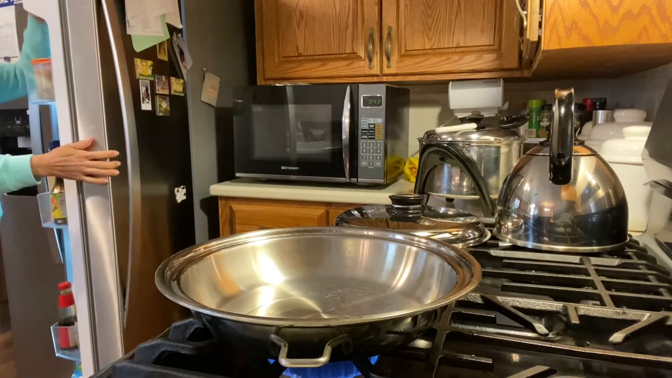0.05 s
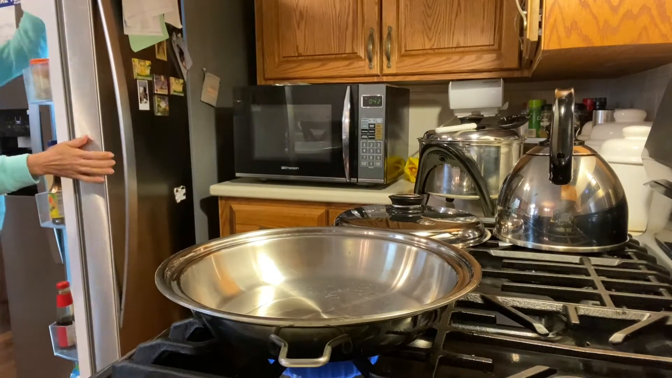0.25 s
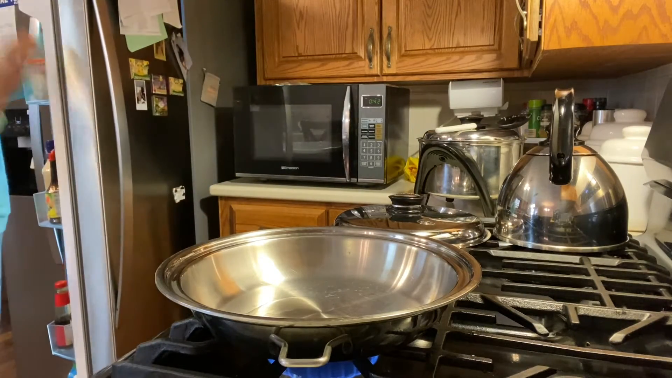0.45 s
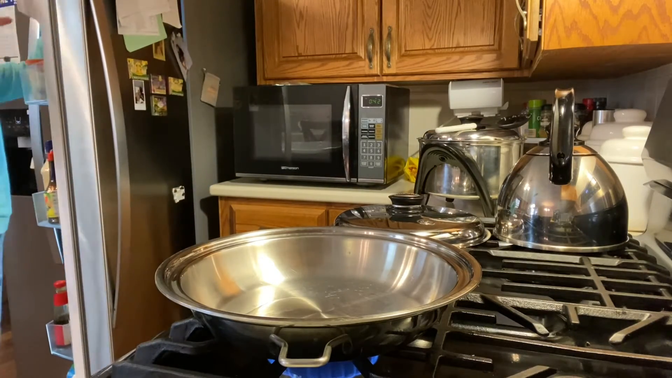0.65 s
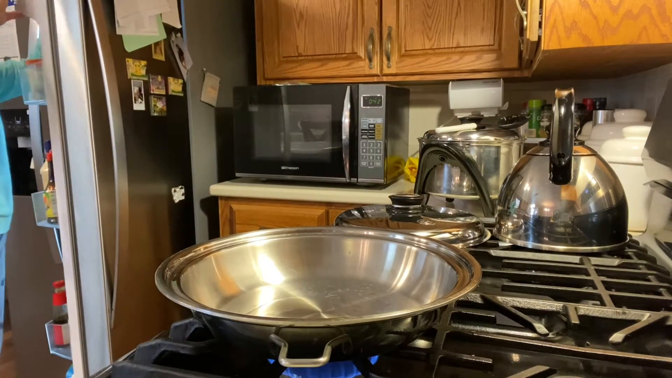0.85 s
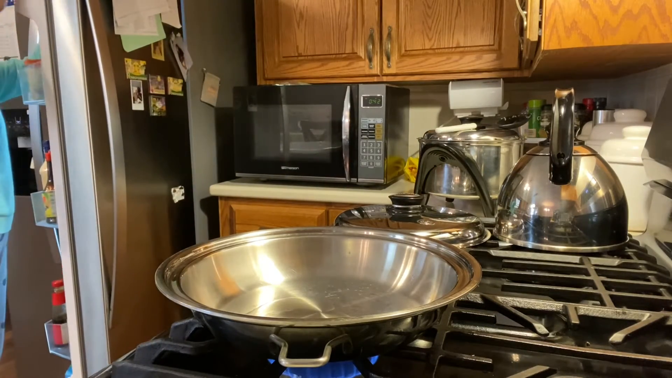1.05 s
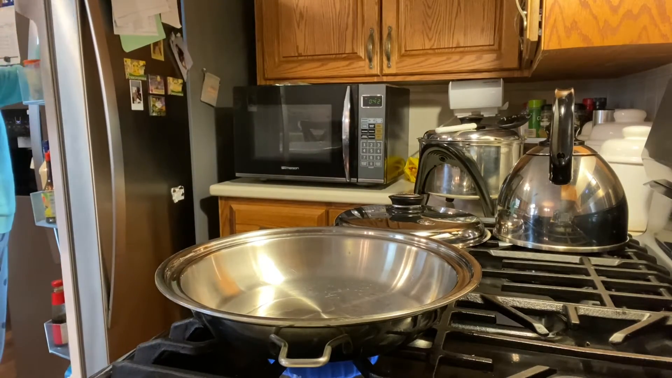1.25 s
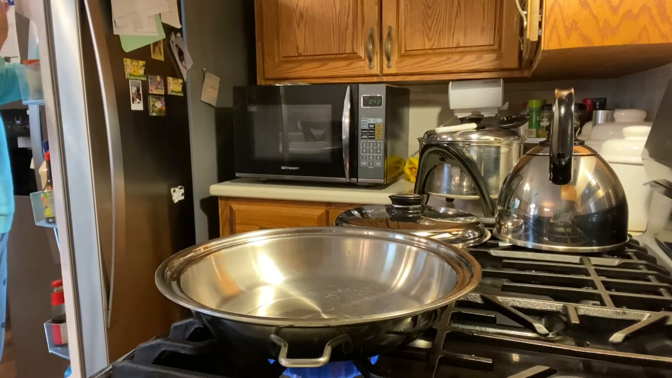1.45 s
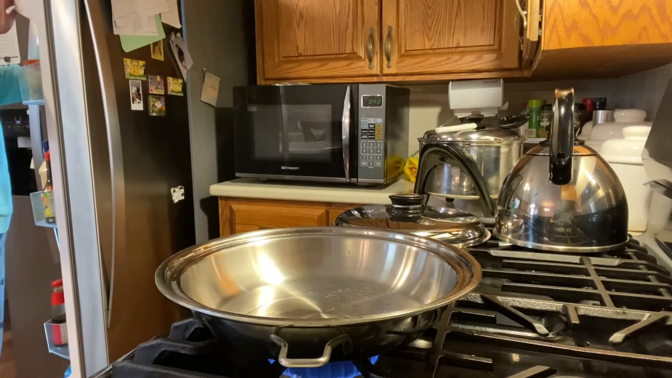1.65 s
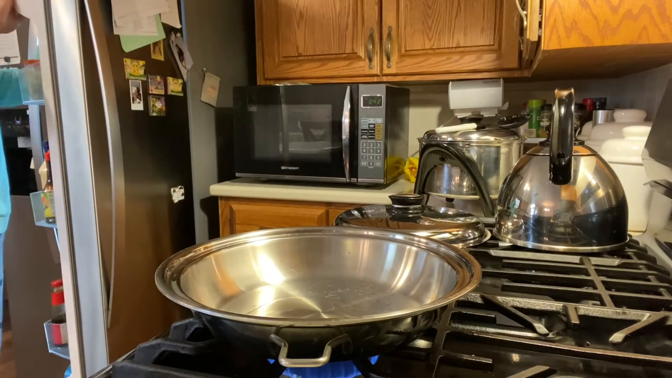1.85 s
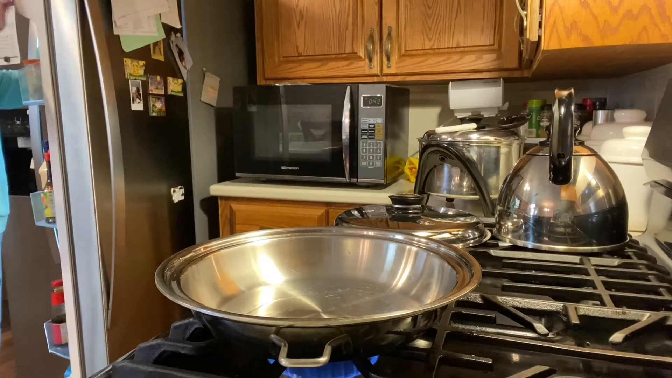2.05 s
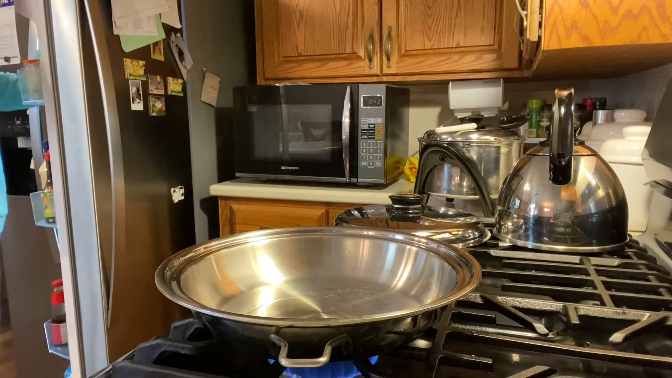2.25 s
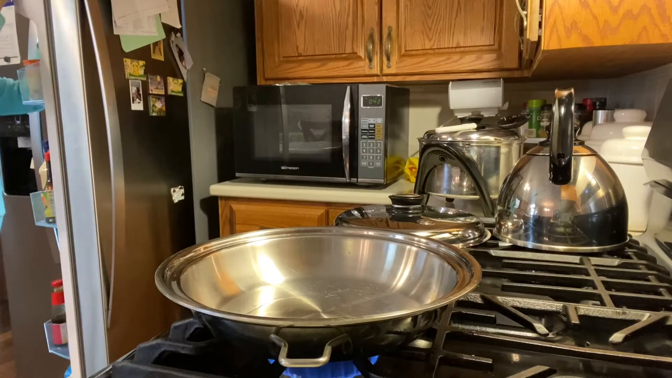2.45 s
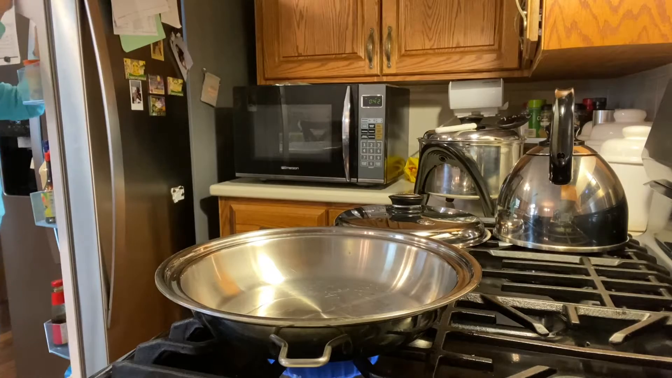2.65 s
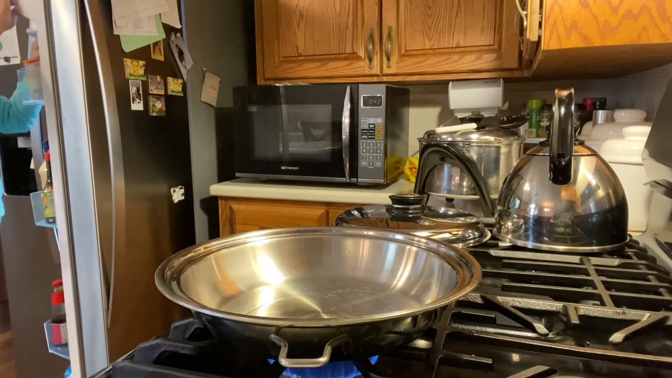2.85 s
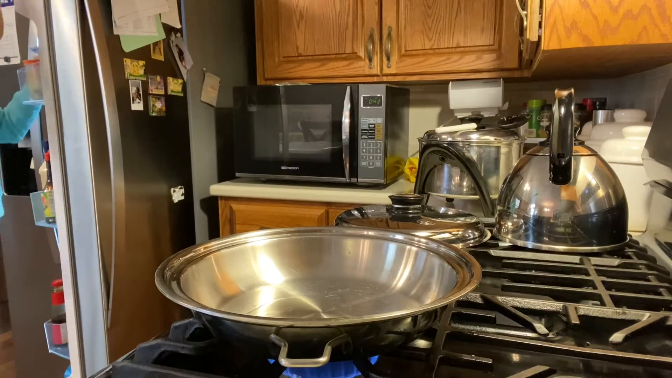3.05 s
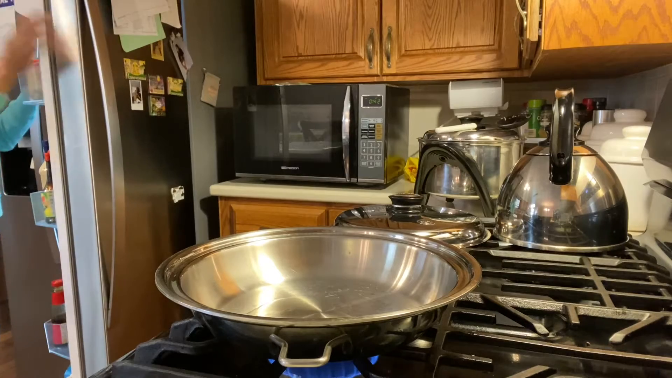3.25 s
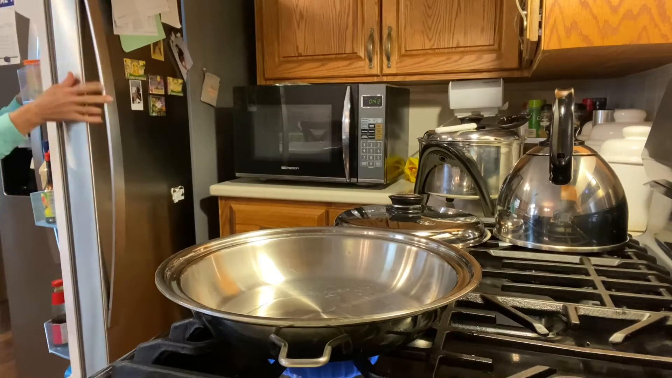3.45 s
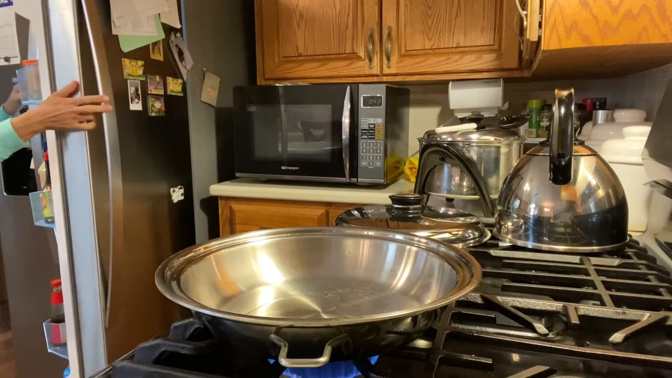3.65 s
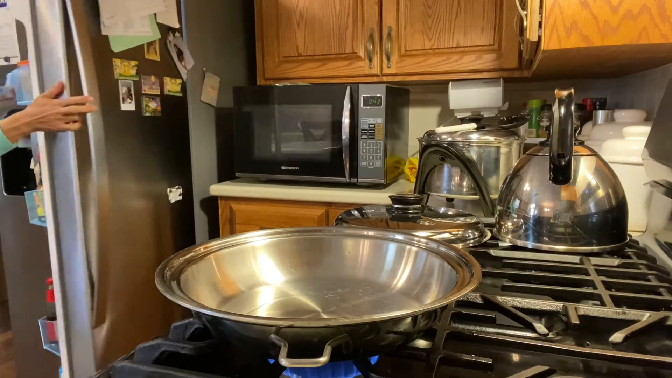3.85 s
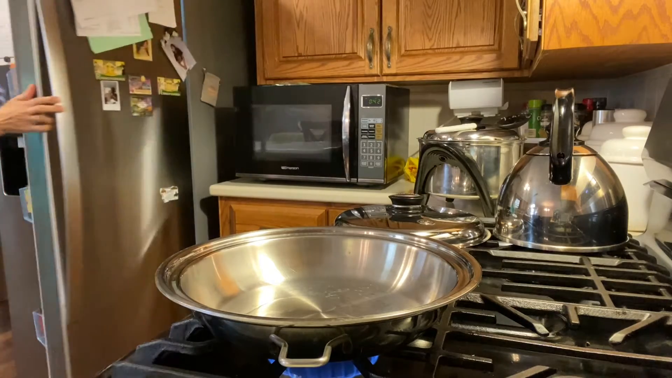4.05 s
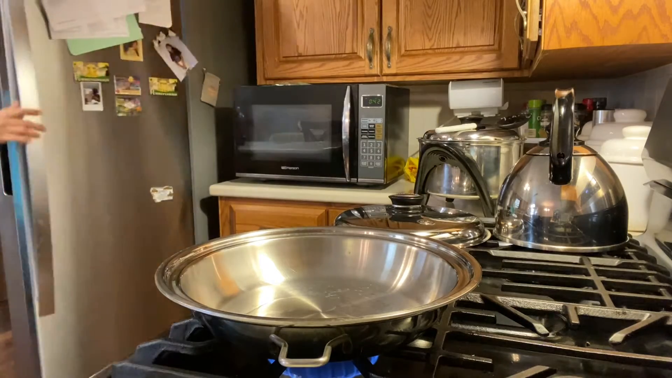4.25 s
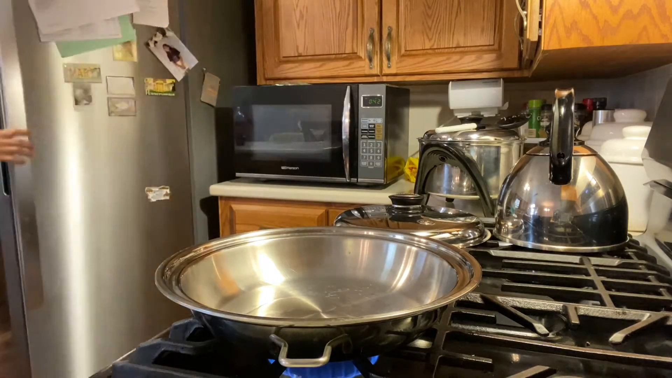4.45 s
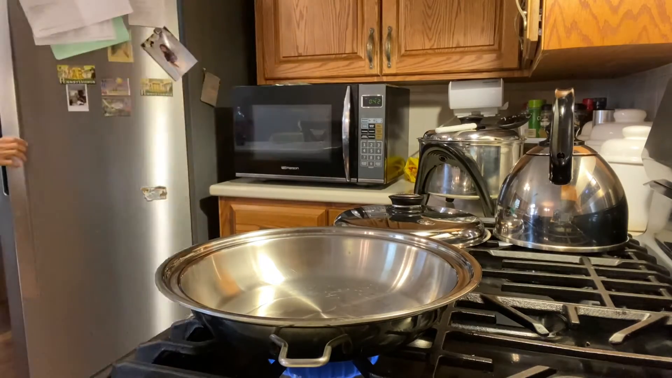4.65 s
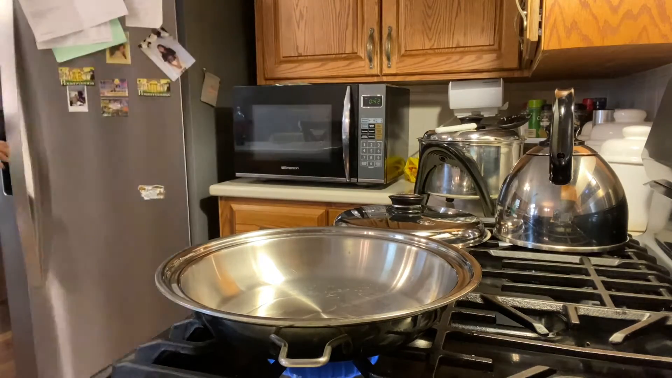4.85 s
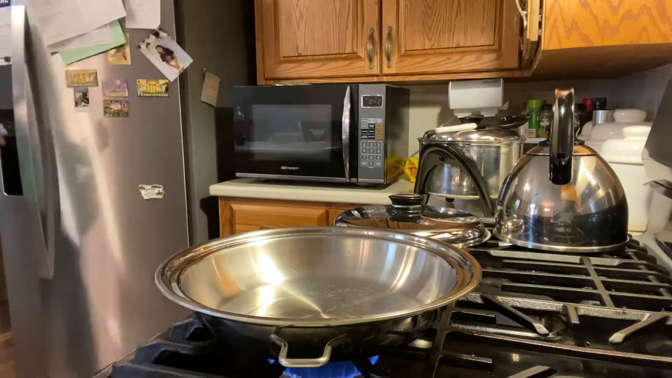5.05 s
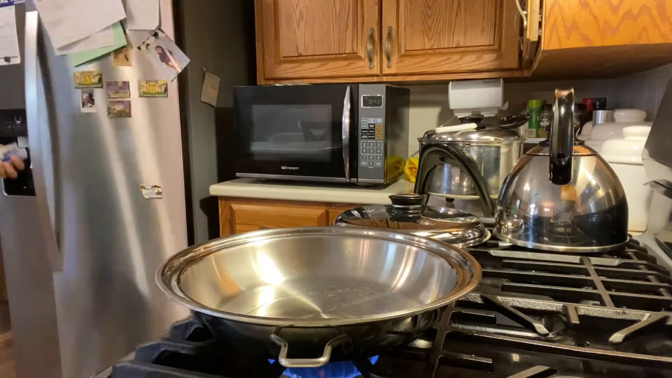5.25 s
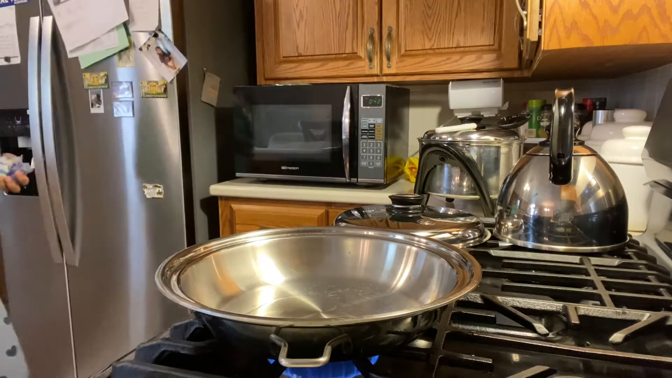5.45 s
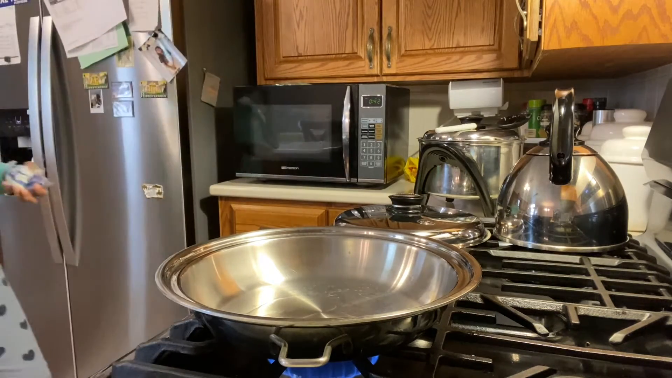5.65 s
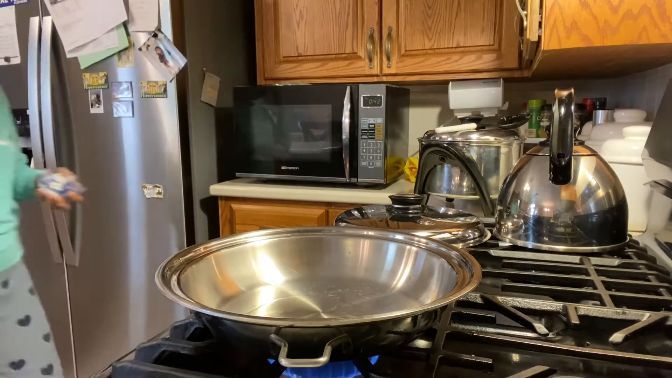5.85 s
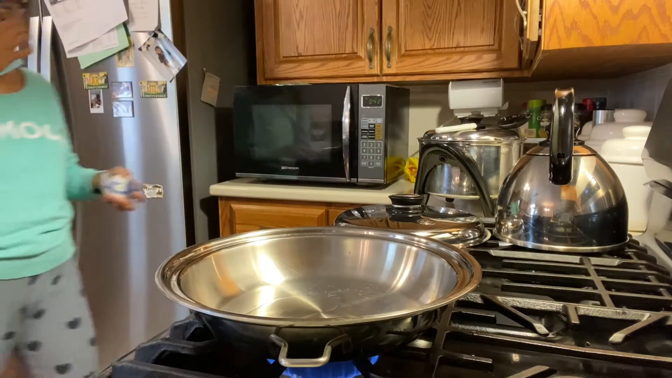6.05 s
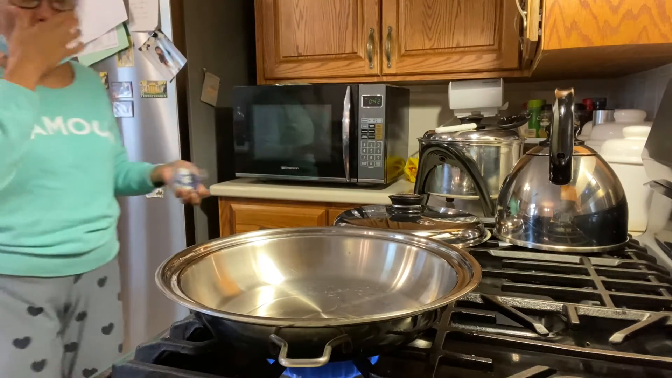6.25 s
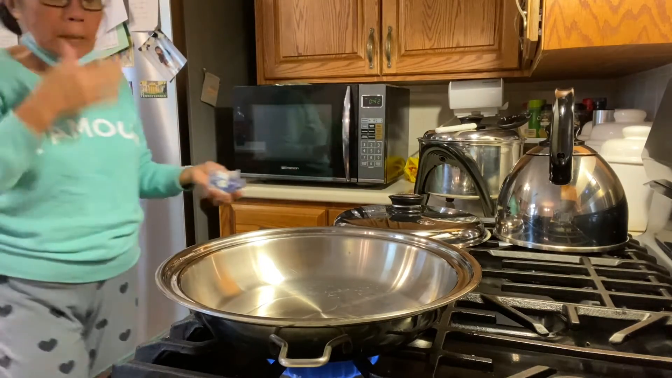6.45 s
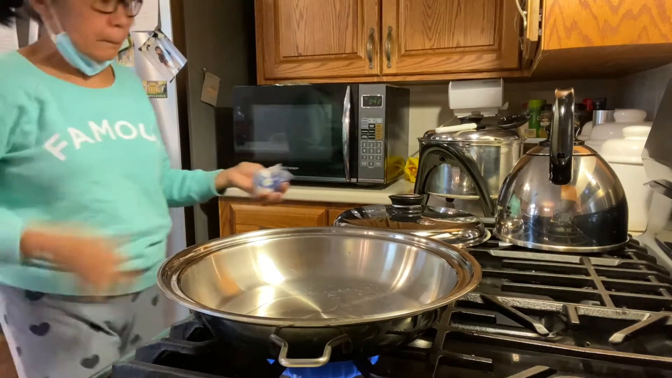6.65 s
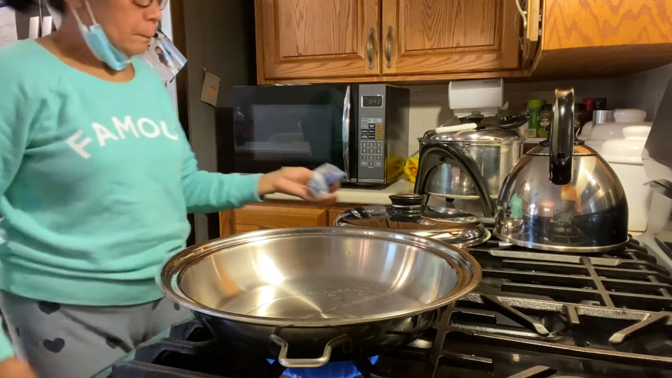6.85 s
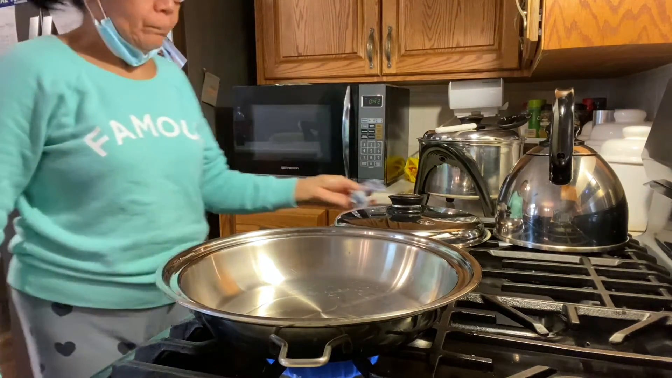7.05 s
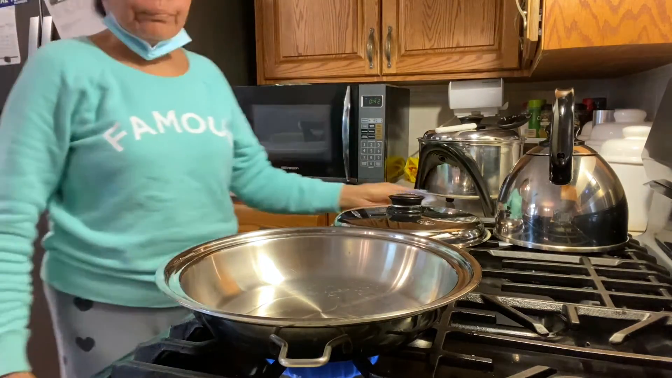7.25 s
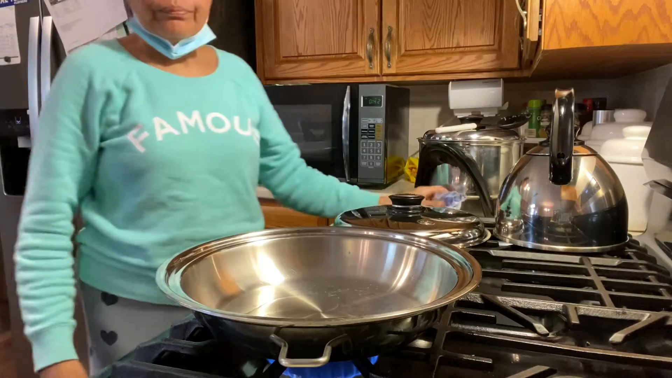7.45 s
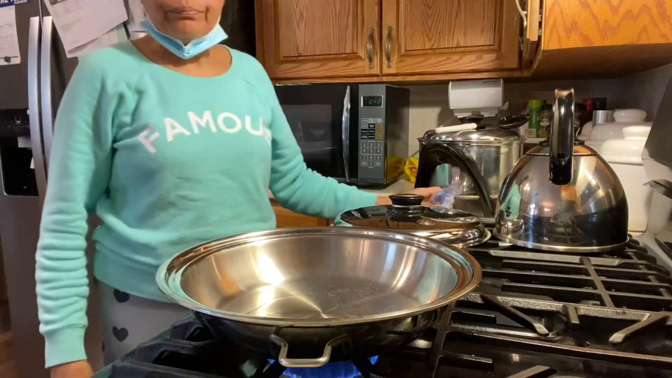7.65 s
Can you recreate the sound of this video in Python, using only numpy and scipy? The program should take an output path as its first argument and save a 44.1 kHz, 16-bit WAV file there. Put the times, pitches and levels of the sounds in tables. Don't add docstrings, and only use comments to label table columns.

```python
import sys
import numpy as np
from scipy import signal
from scipy.fft import rfft, irfft
from scipy.io import wavfile
from scipy.ndimage import uniform_filter1d

SR = 44100
rng = np.random.default_rng(int(sys.argv[2]) if len(sys.argv) > 2 else 0)


def transcribe(u):
    v = np.clip(np.atleast_2d(u).T, -1, 1)
    q = np.round(v * 32767).astype(np.int16)
    wavfile.write(sys.argv[1], SR, q)


def decibels_to_gain(level_db):
    exponent = np.asarray(level_db, float) / 20
    return 10 ** exponent


N = 340517

# (time [s], knock level [dB], boom level under 300 Hz [dB], knock pitch [Hz])
BUMPS = [(0.517, -56, -45.5, 606), (1.063, -39, -44, 520), (1.078, -30.5, -49, 426), (1.114, -46, -45, 447),
         (1.222, -35.5, -37, 500), (1.231, -27, -30, 394), (1.262, -46, -33.5, 420),
         (1.446, -39.5, -64, 590), (1.491, -32, -39, 612), (1.511, -34, -53, 466), (1.745, -47, -70, 580),
         (1.769, -35.5, -45, 620), (1.88, -42.5, -66, 410), (2.06, -38.5, -45, 510),
         (2.955, -16.5, -28, 550), (2.99, -28, -37, 300), (3.027, -38, -38, 486), (3.335, -76, -65, 704),
         (3.359, -34, -28.5, 640), (3.389, -53, -30.5, 625), (3.898, -56, -48, 584), (5.261, -42, -40, 710),
         (5.429, -45, -46, 900), (5.469, -33, -26, 330), (5.816, -23.5, -25.5, 337),
         (5.861, -35.5, -30, 430), (6.453, -45, -63, 685), (6.564, -42, -40, 473), (6.798, -44, -65, 350),
         (7.156, -39, -39.5, 396), (7.503, -43.5, -43.5, 300)]
# (time [s], clack level 0.9-2.2 kHz [dB], tick level above [dB])
CLICKS = [(0.518, -53.5, -56), (0.779, -50.5, -46), (1.06, -58.5, -55), (1.087, -57, -53),
          (1.229, -58, -50), (1.411, -68, -55), (1.449, -50.5, -60), (1.458, -69, -41.5),
          (1.491, -41.5, -37), (1.541, -66, -57), (1.562, -66, -37.5), (1.772, -53, -53),
          (1.801, -59, -46.5), (1.869, -52, -52), (2.059, -55, -55.5), (2.326, -63, -43),
          (2.595, -64, -46.5), (2.71, -58, -45), (2.955, -30.5, -27), (2.989, -50, -34),
          (3.334, -54, -46.5), (3.36, -81, -43), (4.199, -77, -74), (4.795, -62, -78), (4.974, -58, -49),
          (5.261, -43.5, -43), (5.469, -38, -38), (5.861, -49, -41), (6.095, -54, -48), (6.187, -50, -38),
          (6.24, -57, -68), (6.437, -76, -67), (6.645, -61, -37.5), (7.048, -51, -44), (7.488, -45, -43),
          (7.514, -50.5, -38), (7.601, -40, -40.5)]
# (frequency [Hz], level [dB], t60 [s])
CABINET_MODES = [(89.1, -5, 0.76), (123.6, -6, 0.65), (230, 10, 0.28), (304.6, -0.5, 0.27),
                 (338.5, 1.5, 0.34), (468, 4.5, 0.075), (520, -6, 0.28), (730, -8.5, 0.35),
                 (924, -13, 0.21), (1012, -16, 0.34), (1250, -20, 0.12)]
# (time [s], blow level [dB], ring length [factor])
DRAWER_BLOWS = [
    (2.955, -34.5, 1),
    (2.987, -33, 0.61),
    (3.36, -46.5, 0.33),
]
# (time [s], blow level [dB])
DOOR_BLOWS = [
    (5.468, -9),
    (5.475, -33),
    (5.506, -22),
]
# (frequency [Hz], level [dB], t60 [s])
DOOR_MODES = [(121.5, -15, 0.2), (203, -18, 0.3), (181, -9.5, 0.11), (237.8, -20, 0.3), (324, -31, .3),
              (425, -28, .1), (510, -15, 0.24), (562, -8, 0.066), (683, -23, 0.13), (864, -28, 0.3),
              (950, -43, 0.19), (1136, -47, 0.27), (1407, -38, 0.47), (1800, -36, 0.043)]
# (frequency [Hz], density [dB per Hz])
SLAP_SPECTRUM = [(180, -35), (300, 0), (527, 1), (802, -1), (900, -14.5), (1200, -6), (2590, -22.5),
                 (3030, -34), (7540, -22), (9500, -29), (12400, -73), (20900, -120)]
# (time [s], pitch [Hz], level [dB], rise [s], t60 [s])
THUMPS = [(1.232, 197.6, -33, .004, 0.34), (1.235, 84.8, -32, 0.0061, 0.47),
          (1.25, 399, -38.5, .003, 0.18), (1.185, 488, -45, .005, .1), (1.212, 448, -41, .003, 0.09),
          (1.272, 236, -41, 0.0034, 0.13), (1.492, 653, -32, 0.0021, .1),
          (1.51, 505, -33.5, 0.0016, 0.078), (1.54, 475, -36.5, .002, .06),
          (2.062, 559, -47, .003, 0.22), (3.41, 125, -37.5, .008, 0.3), (2.96, 95.3, -31, 0.0079, 0.62),
          (2.961, 163, -23, 0.0033, 0.16), (2.964, 121.5, -34, .005, .7),
          (2.977, 232, -27.5, 0.004, 0.42), (2.98, 258.4, -29.5, .004, 0.36),
          (3.356, 654, -42, 0.0013, 0.3), (3.358, 1043, -45, 0.0017, 0.26),
          (3.362, 292, -40, 0.0027, 0.076), (3.422, 665, -43.5, .004, 0.07),
          (3.39, 230, -27.5, 0.0018, 0.13), (5.472, 64.3, -12, 0.011, 0.14),
          (5.472, 126, -24, 0.0036, 0.15), (5.506, 115.4, -21, 0.0094, 0.11),
          (5.514, 68, -21.5, 0.0046, 0.19), (5.529, 109.6, -33, 0.009, 0.25),
          (5.71, 119, -43, 0.0068, 0.45), (5.819, 310, -37, 0.0017, 0.1),
          (6.566, 123, -48, 0.011, 0.26), (7.161, 302, -50.5, 0.0053, 0.24),
          (7.511, 238, -40, 0.004, 0.059), (7.602, 1300, -28, 0.00026, 0.017),
          (1.9, 331, -49, 0.0074, 0.26), (2.085, 698, -48.5, .003, 0.093),
          (2.109, 395, -47, 0.0035, 0.11), (2.535, 700, -64.5, .01, .15), (5.49, 950, -36, .003, 0.29)]
# (time [s], level [dB], pitch [Hz])
SNAPS = [
    (1.491, -26, 1230),
    (1.772, -36.5, 1070),
    (2.954, -19.5, 1205),
    (5.261, -35, 1340),
    (5.469, -14.5, 592),
    (6.243, -47, 990),
    (7.513, -32.5, 1500),
    (3.565, -48, 1500),
    (4.795, -50, 1550),
]

# (time [s], length [s], level [dB], whistle start [Hz], whistle end [Hz])
SCUFFS = [(1.457, 0.039, -47.5, 7800, 7200), (1.561, 0.022, -42.5, 4920, 4430),
          (2.326, 0.041, -50, 2720, 2630), (5.422, 0.024, -54, 3130, 3130), (5.912, 0.072, -47, 4600, 4500),
          (6.176, 0.11, -44, 3070, 3820), (6.55, 0.18, -61.5, 1910, 1740), (6.638, 0.16, -50, 2440, 1780),
          (7.03, 0.035, -50, 1800, 2140), (7.046, 0.11, -45.5, 4430, 5400),
          (7.085, 0.15, -48.5, 2440, 2660), (7.31, 0.18, -55, 1680, 2480), (7.487, 0.1, -54, 3140, 2940),
          (7.59, 0.18, -58.5, 2300, 2400)]
# (time [s], length [s], level [dB], whistle start [Hz], whistle end [Hz])
CREAKS = [
    (0.0, 0.033, -53, 3150, 2780),
    (.045, 0.089, -51, 2460, 3570),
    (.12, 0.099, -59.5, 3830, 3580),
    (5.07, 0.37, -65.5, 2000, 1740),
]
# (time [s], length [s], level [dB], whistle start [Hz], whistle end [Hz])
GLIDES = [
    (6.085, 0.12, -51, 3270, 3140),
    (6.372, 0.15, -49, 3600, 4200),
    (6.825, 0.12, -42.5, 2830, 3640),
]
# (time [s], length [s], level [dB],
# whistle start [Hz], whistle end [Hz])
SWISHES = [(0.0, 0.061, -55, 5630, 5700), (.055, 0.12, -60, 6750, 6900), (.065, 0.18, -60.5, 8700, 8600),
           (.135, 0.12, -63, 6800, 6900), (4.565, 0.073, -73.5, 3620, 3700), (4.6, 0.044, -83, 6050, 6000),
           (4.67, 0.12, -68, 2900, 2740), (4.8, 0.26, -75, 3530, 3300), (5.915, 0.19, -62, 7300, 7100),
           (6.085, 0.12, -51, 4700, 4800), (.465, 0.13, -65, 2100, 2590), (4.53, 0.082, -70, 2450, 2550),
           (4.58, 0.11, -74, 2900, 2950), (4.625, 0.15, -57, 2460, 2250), (4.65, 0.045, -69, 4000, 3730),
           (4.66, 0.12, -56, 1800, 1530), (4.79, 0.033, -52, 1800, 2010), (4.965, 0.076, -57, 2580, 2800),
           (5.1, 0.093, -57, 1820, 1800), (5.915, 0.16, -51.5, 2320, 2350), (6.12, 0.068, -47, 2080, 1900),
           (6.19, 0.061, -43, 6000, 6470), (6.41, 0.036, -48, 4400, 4300), (6.42, 0.13, -61, 8440, 8100),
           (6.645, 0.082, -46, 3150, 2640), (6.65, 0.046, -42, 5740, 5440),
           (6.85, 0.092, -46.5, 3800, 3980), (7.09, 0.043, -49.5, 3570, 4300),
           (7.36, 0.26, -58.5, 6300, 6600), (1.558, .1, -53, 6400, 6300), (5.672, 0.12, -57, 3230, 3200),
           (5.675, 0.11, -59.5, 4100, 3900), (7.04, 0.1, -48, 3120, 2980), (7.04, .1, -53, 6700, 6760)]
# (rise [share of length], hold [share of length], start depth [dB],
# end depth [dB], brightness [dB], whistle [share])
SCUFF_STROKE = (0.28, 0.43, -7.5, 34.5, -6, 0.65)
CREAK_STROKE = (0, 2.5, -11, 30, -29, 2.5)
GLIDE_STROKE = (0.33, 0.07, 1.5, 29, -6, .5)
SWISH_STROKE = (0.42, -0.39, 2, 22.5, -48, 5.5)
# (time [s], level [dB], brightness [dB])
CRINKLES = [(0.779, -52, -1), (1.08, -55.5, -1), (1.44, -63, 7), (1.554, -52, -9), (1.78, -56, -13),
            (2.098, -75, 5.5), (2.209, -65.5, 0.5), (2.325, -60, -4), (2.601, -58, -1), (2.71, -61, -22),
            (2.87, -61.5, -1.5), (2.909, -54.5, -1), (2.98, -60, -34), (3.37, -58.5, 2),
            (3.498, -69.5, -18), (3.74, -67.5, -10), (3.85, -78, -4), (4.03, -84, 9), (4.208, -65, -3),
            (4.31, -76.5, 5)]
# (start [s], end [s], start pitch [Hz], end pitch [Hz], level [dB])
SQUEAKS = [(0.037, 0.077, 2890, 2760, -64), (0.053, 0.098, 2240, 2295, -53.5),
           (0.071, 0.103, 4360, 5170, -56.5), (0.089, 0.121, 2570, 2600, -56),
           (0.113, 0.168, 2820, 3100, -59), (0.096, 0.237, 2230, 2270, -75),
           (0.112, 0.195, 3543, 3376, -58), (0.196, 0.256, 3480, 3350, -66), (0.1, 0.135, 4170, 3970, -62),
           (0.46, 0.528, 2060, 3140, -69), (0.523, 0.587, 3200, 1650, -60), (0.555, 0.608, 2080, 1560, -58),
           (0.598, 0.78, 1235, 1046, -66), (0.639, 0.75, 2530, 2200, -68.5), (4.575, 4.67, 3090, 2920, -71),
           (4.73, 4.773, 1596, 1500, -60), (4.79, 4.852, 1550, 1670, -68),
           (4.798, 4.858, 2030, 1930, -64.5), (4.801, 4.839, 4070, 3600, -73),
           (4.866, 4.96, 1970, 1850, -74), (5.094, 5.218, 1160, 1000, -69.5),
           (5.513, 5.528, 1780, 1750, -57), (5.552, 5.723, 2074, 2124, -53),
           (5.593, 5.736, 2304, 2190, -60.5), (5.67, 5.723, 3180, 3030, -64),
           (5.73, 5.773, 3330, 3270, -72), (5.808, 5.839, 1740, 1090, -44.5),
           (7.454, 7.495, 3710, 3300, -64.5), (7.463, 7.524, 6930, 6050, -58),
           (7.517, 7.57, 2200, 2510, -49.5), (7.537, 7.72, 2420, 2410, -54.5),
           (5.548, 5.596, 2040, 2090, -53), (7.489, 7.54, 3300, 2970, -55),
           (3.837, 3.895, 4910, 4900, -83.5), (0.04, 0.07, 2800, 2260, -62)]
# (time [s], start pitch [Hz], end pitch [Hz], level [dB], rise [s])
WHINE = (7.5, 2384, 2432, -51.5, .03)

# (frequency [Hz], level [dB])
HUM = [(59.2, -52), (118.4, -61.5), (177.6, -66.5), (204.6, -56), (355.3, -69.5), (1082, -86.5),
       (2040, -82.5), (2422, -87.5)]
# (frequency [Hz], density [dB per Hz])
AIR_SPECTRUM = [(15, -53), (25, -27.5), (58, -11), (153, -8), (202, -7.5), (228, -4.5), (252, -19),
                (357, -14), (617, -32), (1070, -32.5), (1510, -42.5), (1980, -33), (2810, -46),
                (3690, -46.5), (9500, -54.5), (12400, -87), (20900, -120)]
# (frequency [Hz], correlation [-1 to 1])
AIR_LIKENESS = [(60, 1), (180, -0.4), (550, 0.22), (1650, -0.064), (4970, -0.077), (15000, 0.6)]
# (frequency [Hz], t60 [s])
KITCHEN_T60 = [(60, 0.46), (200, 0.62), (600, 0.48), (2000, 0.4), (5000, 0.39), (10000, 0.19)]
# (time [s], echo level [dB])
DISTANCE = [
    (0, -3),
    (5.4, -1),
    (5.74, -9.5),
    (5.81, -9),
    (6, -3),
    (7.4, -1),
    (7.48, -3),
    (7.72, -13.5),
]
# (frequency [Hz], gain [dB])
MIC_COLOUR = [(8500, 1), (9500, 1), (10500, -1), (11500, -5), (13500, -7), (15650, -8), (15850, -40)]


def evened(x):
    return x / np.sqrt(np.mean(x ** 2) + 1e-20)


def read(points, hz):
    f, value = np.transpose(points)
    return np.interp(np.log(hz + 1), np.log(f + 1), value)


def add(mix, s, sound):
    part = mix[round(s * SR):][:len(sound)]
    part += sound[:len(part)]


def band(x, lo_hz, hi_hz):
    sos = signal.butter(3, [lo_hz, hi_hz], "band", fs=SR, output="sos")
    return signal.sosfilt(sos, x) * np.sqrt(SR / 2 / (hi_hz - lo_hz))


def coloured(x, points):
    count = x.shape[-1]
    gain = decibels_to_gain(read(points, np.fft.rfftfreq(count, 1 / SR)))
    return irfft(rfft(x) * gain, count)


def resonate(x, hz, width_hz):
    turn = np.exp(2j * np.pi * np.cumsum(hz) / SR)
    r = np.exp(-np.pi * abs(width_hz) / SR)
    return 2 * (turn * signal.lfilter([1 - r], [1, -r], x / turn)).real


def ring(modes):
    t = np.arange(SR // 2) / SR
    return sum(decibels_to_gain(db - 60 * t / t60) * np.tanh(hz * t) * np.sin(2 * np.pi * hz * t)
               for hz, db, t60 in modes)


def grainy(count, spread_db):
    flicker = evened(uniform_filter1d(rng.standard_normal(count), 40))
    clumps = evened(uniform_filter1d(rng.standard_normal(count), 450))
    return evened(rng.standard_normal(count) * decibels_to_gain(spread_db * flicker + 2.0 * clumps))


def knocks():
    bump_s, bump_clack_db = 0.0071, -15.5
    click_s, click_knock_db = 0.009, -7.5
    rows = [(s, bump_s, knock, boom, knock + bump_clack_db, -120) for s, knock, boom, _ in BUMPS]
    rows += [(s, click_s, clack + click_knock_db, -120, clack, tick) for s, clack, tick in CLICKS]
    push = np.zeros((4, N))
    t = np.arange(3000) / SR
    onset = np.tanh(t / 0.00068)
    for s, contact_s, *levels_db in rows:
        rough = rng.standard_normal(3000)
        for track, db, stretch in zip(push, levels_db, (1.4, 1.79, 0.87, 0.54)):
            decay = np.exp(-t / (stretch * contact_s)) + 0.23 * np.exp(-t / 0.0023)
            add(track, s, decibels_to_gain(db) * rough * onset * decay)
    knock, boom, clack, tick = push
    start, *_, pitch_hz = np.transpose(BUMPS)
    latest = np.searchsorted(start * SR, np.arange(N)) - 1
    knock_hz = pitch_hz[np.maximum(latest, 0)]
    low = 0.47 * band(boom, 66.0, 233)
    low += 3.37 * resonate(band(knock, 302, 1330) / 4, knock_hz, 186)
    high = 0.5 * band(tick, 2450, 5570) + 0.41 * band(tick, 4400, 21400)
    return low + 0.8 * band(clack, 1060, 2090) + high


def drawer():
    out = np.zeros(N)
    for s, db, length in DRAWER_BLOWS:
        modes = [(hz, mode_db, length * t60) for hz, mode_db, t60 in CABINET_MODES]
        add(out, s, decibels_to_gain(db) * ring(modes))
    return out


def door():
    out, t = np.zeros(N), np.arange(8192) / SR
    panel = ring(DOOR_MODES)
    for s, db in DOOR_BLOWS:
        slap = evened(coloured(rng.standard_normal(8192), SLAP_SPECTRUM)) * np.exp(-t / 0.0033)
        add(out, s, decibels_to_gain(db) * panel)
        add(out, s, decibels_to_gain(db - 1.5) * slap)
    return out


def thump():
    out, t = np.zeros(N), np.arange(SR // 2) / SR
    for s, hz, db, rise, t60 in THUMPS:
        swell = decibels_to_gain(db - 60 * np.maximum(t - 2 * rise, 0) / t60) * np.tanh(t / rise)
        add(out, s, -swell * np.sin(2 * np.pi * hz * t))
    return out


def snaps():
    out, t, t60_s = np.zeros(N), np.arange(2000) / SR, 0.041
    for s, db, hz in SNAPS:
        add(out, s, decibels_to_gain(db - 60 * t / t60_s) * np.sin(2 * np.pi * hz * t))
    return out


def scuffs(rows, stroke):
    rise, hold, rise_db, release_db, bright_db, share = stroke
    rise, share = np.clip(rise, .01, .9), np.clip(share, 0, 1)
    grit_per_s, grit_db, grit_spread_db = 500, 17.5, -1
    grit_level = decibels_to_gain(grit_db + grit_spread_db * np.minimum(rng.exponential(1, N), 2.5))
    grit = (rng.random(N) < grit_per_s / SR) * grit_level
    floor = evened(grainy(N, spread_db=5.5) + grit)
    body = band(floor, 1460, 6500) + decibels_to_gain(-19) * band(floor, 220, 600)
    top = band(floor[::-1], 5600, 8460) + 1.1 * band(floor, 4850, 13000)
    top_fade = 1.83 - 2.5
    out = np.zeros(N)
    for s, length, db, from_hz, to_hz in rows:
        rub, low, high = (x[round(s * SR):][:round(length * SR)] for x in (floor, body, top))
        u = np.linspace(0, 1, len(rub))
        stray = evened(uniform_filter1d(rng.standard_normal(20000), 500))[:len(u)]
        hz = (from_hz + (to_hz - from_hz) * u) * (1 + .035 * stray)
        stroke_db = np.interp(u, [0, rise, rise + hold, 1], [-rise_db, 0, 0, -release_db])
        whistle = evened(resonate(resonate(rub, hz, 680), hz, 890))
        whistle += 0.23 * evened(resonate(resonate(rub, 1.53 * hz, 1300), 1.54 * hz, 1200))
        hiss = (1 - share) * low + 0.37 * decibels_to_gain(bright_db + top_fade * stroke_db) * high
        edges = signal.windows.tukey(len(u), .05)
        add(out, s, decibels_to_gain(db - 5.5 + stroke_db) * (share * whistle + hiss) * edges)
    return out


def squeaks():
    out, steady = np.zeros(N), .6
    for start, end, from_hz, to_hz, db in SQUEAKS:
        width_hz = 60 + .22 * abs(to_hz - from_hz)
        hz = np.geomspace(from_hz, to_hz, round((end - start) * SR))
        noise = rng.standard_normal(12000)[:len(hz)]
        tone = resonate(resonate(noise, hz, width_hz), hz, width_hz)
        tone = tone / (uniform_filter1d(tone ** 2, size=300) + 1e-12) ** (steady / 2)
        add(out, start, decibels_to_gain(db) * evened(tone) * signal.windows.tukey(len(hz), .3))
    start, from_hz, to_hz, db, rise = WHINE
    t = np.arange(SR // 5) / SR
    phase = 2 * np.pi * np.cumsum(np.geomspace(from_hz, to_hz, len(t))) / SR
    add(out, start, decibels_to_gain(db) * np.tanh(t / rise) * np.sin(phase))
    return out


def rustle():
    out, t = np.zeros(N), np.arange(SR // 2) / SR
    crackle = grainy(N, spread_db=6.0)
    low, high = band(crackle, 270, 3760), band(crackle, 2130, 20000)
    shape = np.tanh(t / 0.0012) * decibels_to_gain(-79 * t)
    for s, db, bright_db in CRINKLES:
        here = slice(round(s * SR), round(s * SR) + len(t))
        add(out, s, decibels_to_gain(db - 7) * shape * (low[here] + decibels_to_gain(bright_db) * high[here]))
    return out


def fan_hum():
    switch_s, coast_db_per_s, coast_db, idle_db_per_s = 5.14, 100, 13, 6
    t = np.arange(N) / SR
    off = np.maximum(t - switch_s, 0)
    tones = np.zeros(N)
    for hz, db in HUM:
        waver = evened(uniform_filter1d(rng.standard_normal(N), 3000))
        tones += decibels_to_gain(db + 2.0 + 0.41 * waver) * np.sin(2 * np.pi * (hz * t + rng.random()))
    tones *= decibels_to_gain(-1.1 - np.minimum(coast_db_per_s * off, coast_db) - idle_db_per_s * off)
    return tones * decibels_to_gain(np.array([[-1.6], [1.6]]))


def room_air():
    air_db, patch_db = -57, 2.2
    frames, hz = N // 512 + 5, np.fft.rfftfreq(2048, 1 / SR)
    a, b, c, d, patches = rng.standard_normal((frames, 1025, 5)).T
    patches = evened(uniform_filter1d(uniform_filter1d(patches, 20, 0), 8, 1))
    same = np.clip(read(AIR_LIKENESS, hz), -1, 1)[:, None]
    left = a + 1j * b
    right = same * left + np.sqrt(1 - same ** 2) * (c + 1j * d)
    level_db = read(AIR_SPECTRUM, np.minimum(hz, 9000))[:, None] + patch_db * patches
    air = signal.istft(np.array([left, right]) * decibels_to_gain(level_db), nperseg=2048, noverlap=1536)[1]
    return decibels_to_gain(air_db) * evened(air[:, :N])


def kitchen():
    taps = np.zeros((2, SR))
    at = np.arange(120, SR - 20, 20) + rng.integers(0, 20, (2, (SR - 121) // 20))
    np.put_along_axis(taps, at, rng.choice([-1., 1.], at.shape), 1)
    hz, t, z = signal.stft(taps, SR, nperseg=512)
    z = z * decibels_to_gain(-60 * t / read(KITCHEN_T60, hz)[:, None])
    alike = np.clip((100 / (hz + 1)) ** 2, 0, .97) + np.clip((hz / 9000) ** 3, 0, .55)
    alike = alike[:, None]
    z[1] = alike * z[0] + np.sqrt(np.maximum(1 - alike ** 2, 0)) * z[1]
    modes = rfft(signal.istft(z, SR, nperseg=512)[1])
    power = abs(modes.sum(0)) ** 2
    scatter = np.sqrt(uniform_filter1d(power, size=500) / uniform_filter1d(power, size=60))
    tail = irfft(modes * scatter)[:, :SR * 3 // 4]
    return tail / np.linalg.norm(tail[0])


def thinned(x):
    return signal.lfilter(*signal.butter(1, 90, "high", fs=SR), x)


def joined_treble(x):
    join_hz, aligned_hz, turn_hz, dwell, loose = 6600, 8150, 4900, .45, 0.033
    (left, right), hz = rfft(x), np.fft.rfftfreq(N, 1 / SR)
    joined = (1 - loose) * np.clip((hz - join_hz) / 1000 + .5, 0, 1)
    angle = 2 * np.pi * (hz - aligned_hz) / turn_hz
    turned = left * np.exp(-1j * (angle - dwell * np.sin(2 * angle)))
    return irfft([left, joined * turned + np.sqrt(1 - joined ** 2) * right], N)


def scene():
    hits = knocks() + drawer() + decibels_to_gain(-7.0) * door()
    rubs = scuffs(SCUFFS, SCUFF_STROKE) + scuffs(CREAKS, CREAK_STROKE)
    rubs += scuffs(GLIDES, GLIDE_STROKE) + scuffs(SWISHES, SWISH_STROKE)
    rubs += rustle() + squeaks()
    near = hits + rubs + thump() + snaps()
    lag_samples = 12
    direct = np.array([near, np.roll(near, lag_samples)]) * decibels_to_gain(np.array([[-1.2], [1.2]]))
    far = decibels_to_gain(np.interp(np.arange(N) / SR, *np.transpose(DISTANCE)))
    thrown = far * (decibels_to_gain(5.5) * thinned(hits) + decibels_to_gain(4.5) * rubs)
    echo = signal.fftconvolve(thrown[None], kitchen(), axes=1)[:, :N]
    return direct + echo + fan_hum() + room_air()


def top_cut(x):
    return signal.sosfilt(signal.butter(12, 15790, fs=SR, output="sos"), x)


def record(dry):
    mix = joined_treble(coloured(dry, MIC_COLOUR))
    return top_cut(mix)


dry = scene()
out = record(dry)
transcribe(out)
```